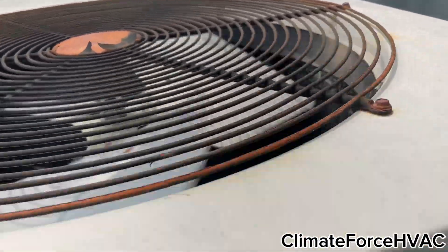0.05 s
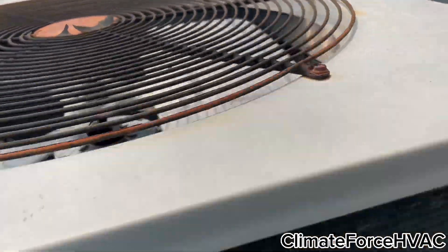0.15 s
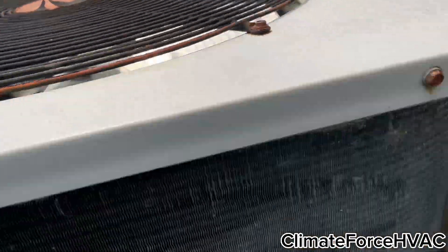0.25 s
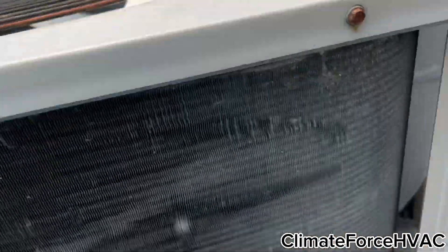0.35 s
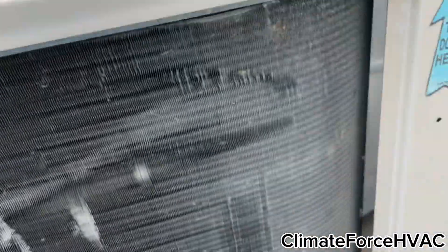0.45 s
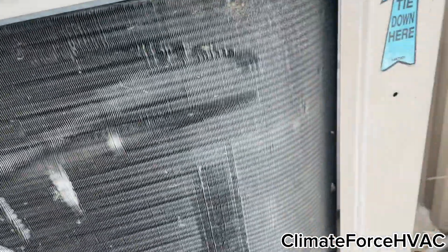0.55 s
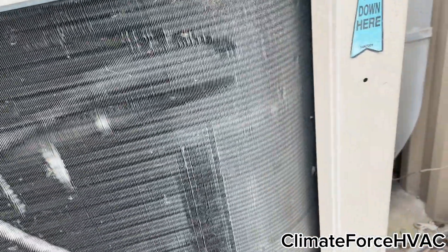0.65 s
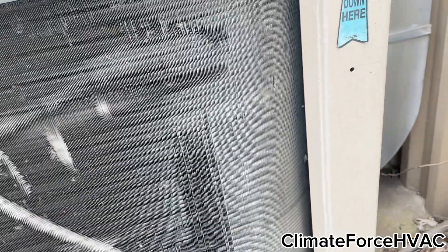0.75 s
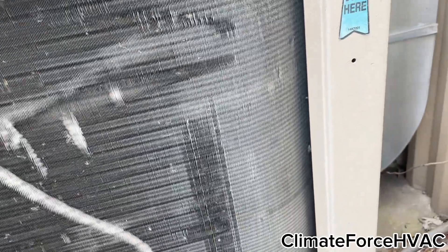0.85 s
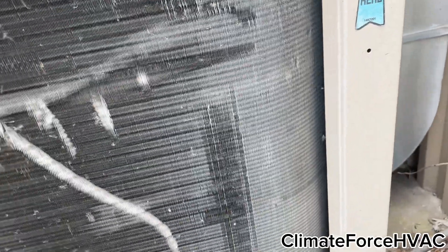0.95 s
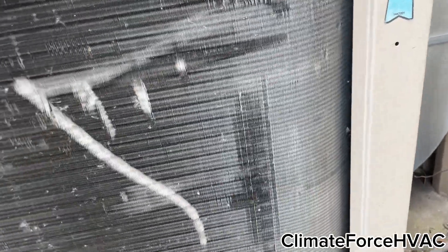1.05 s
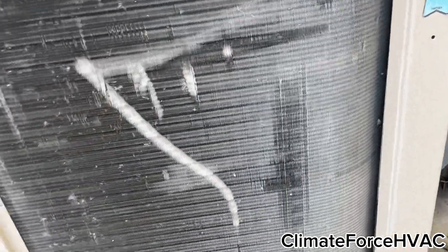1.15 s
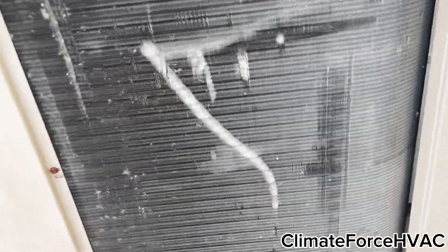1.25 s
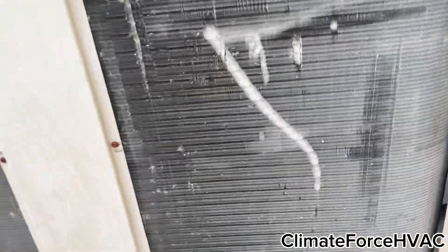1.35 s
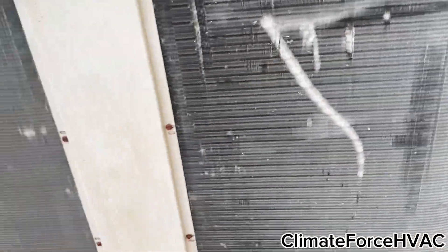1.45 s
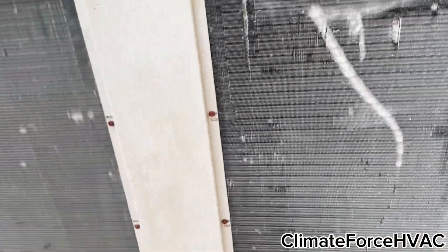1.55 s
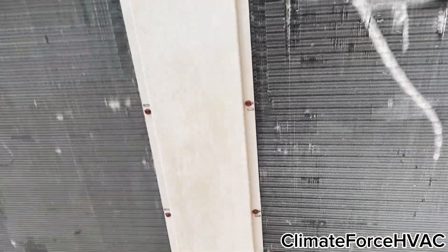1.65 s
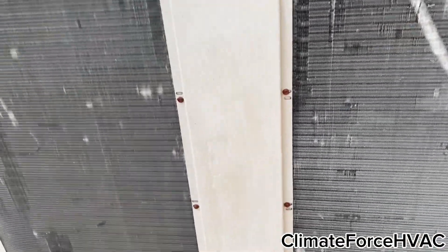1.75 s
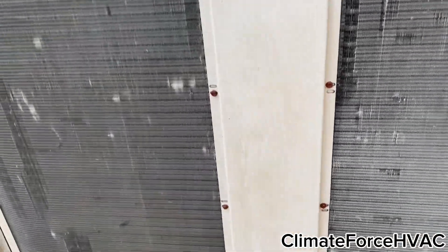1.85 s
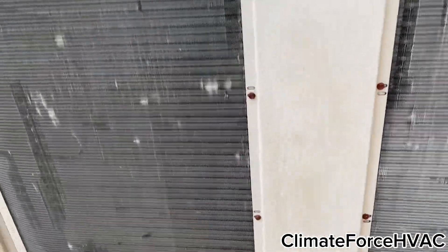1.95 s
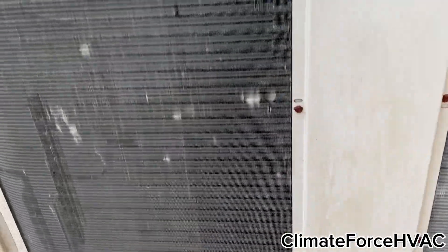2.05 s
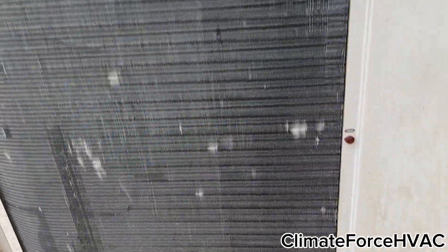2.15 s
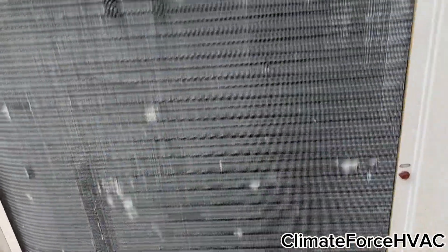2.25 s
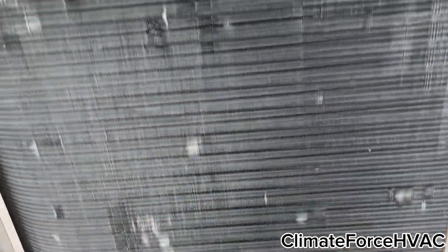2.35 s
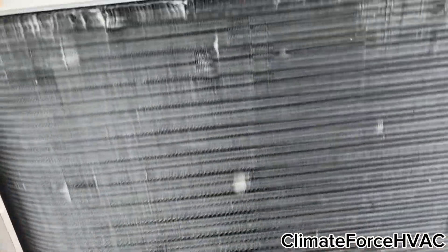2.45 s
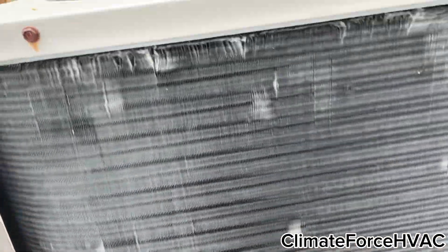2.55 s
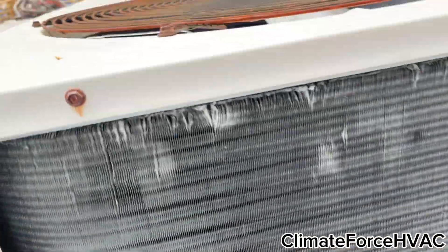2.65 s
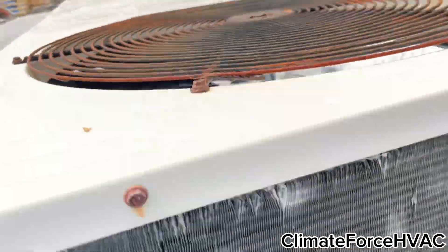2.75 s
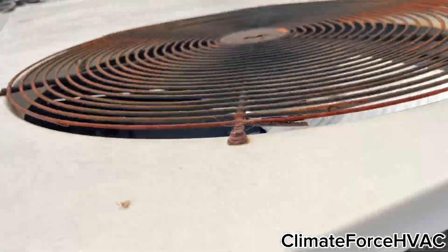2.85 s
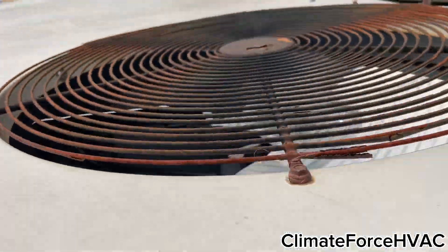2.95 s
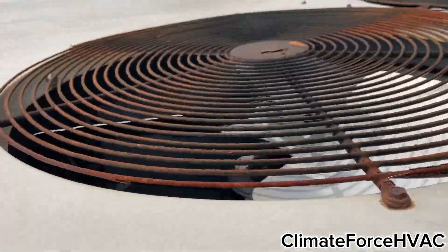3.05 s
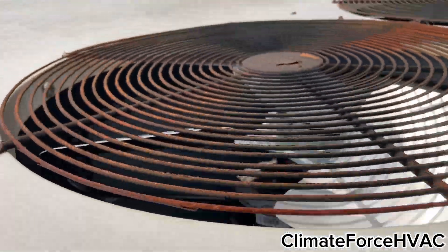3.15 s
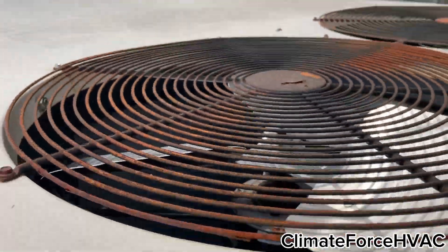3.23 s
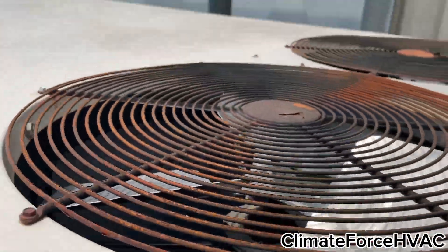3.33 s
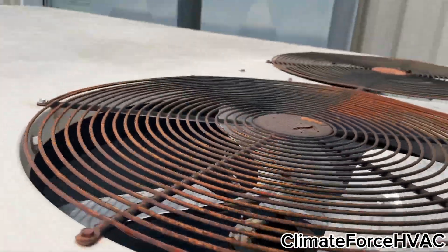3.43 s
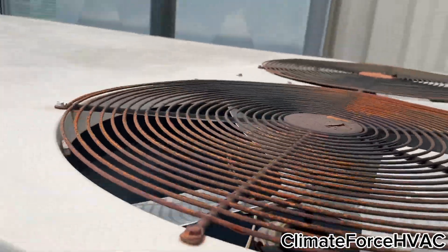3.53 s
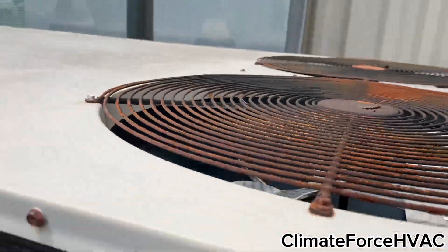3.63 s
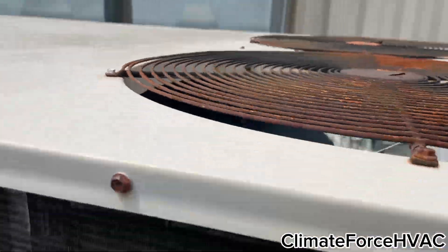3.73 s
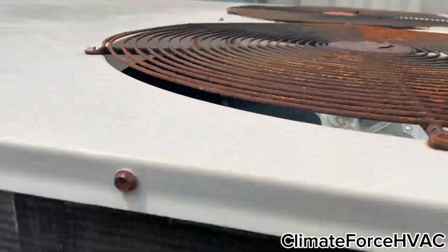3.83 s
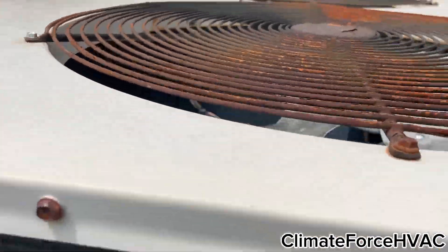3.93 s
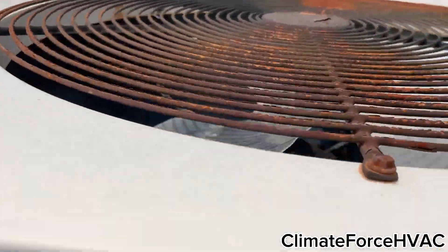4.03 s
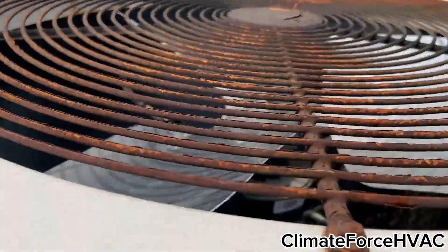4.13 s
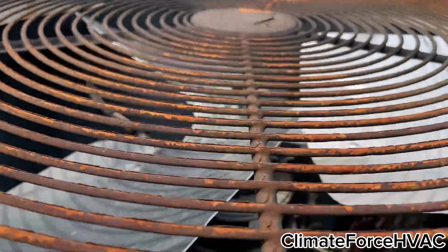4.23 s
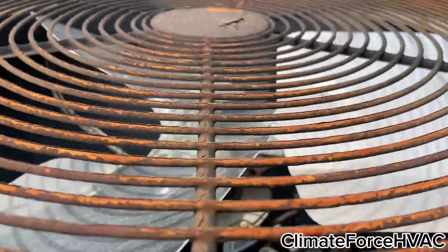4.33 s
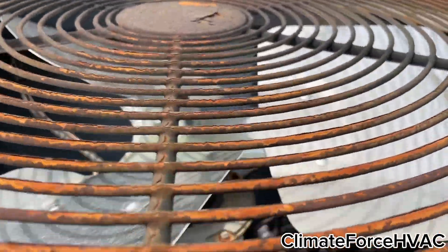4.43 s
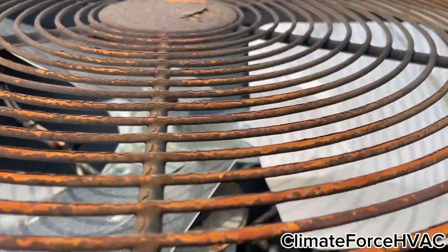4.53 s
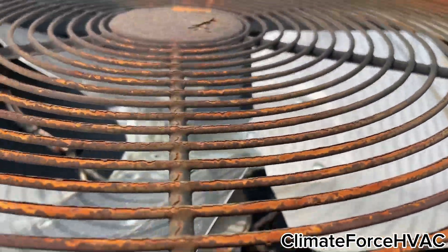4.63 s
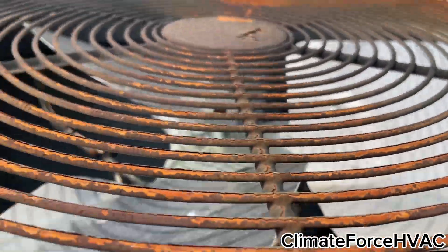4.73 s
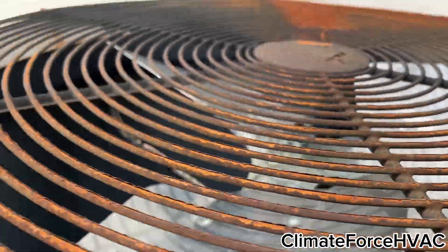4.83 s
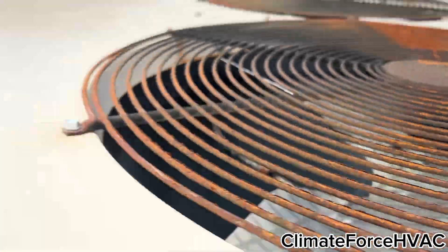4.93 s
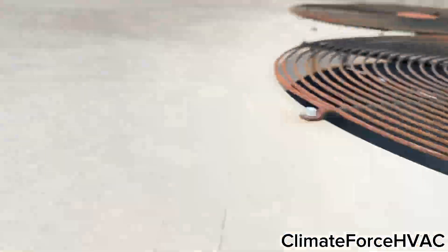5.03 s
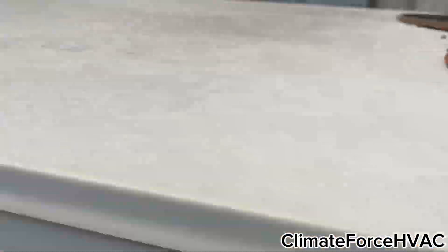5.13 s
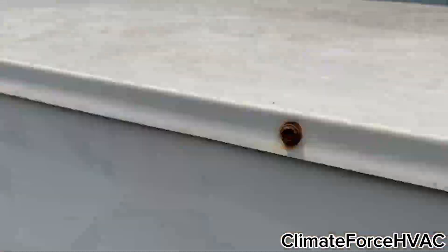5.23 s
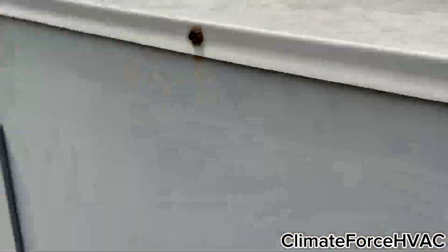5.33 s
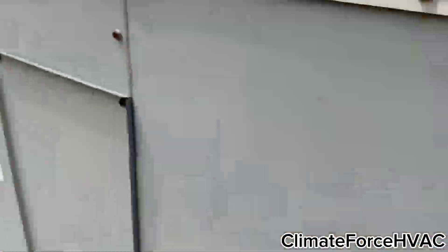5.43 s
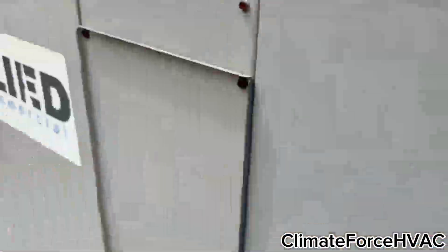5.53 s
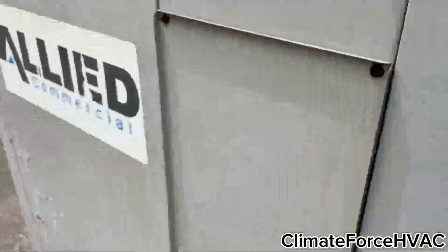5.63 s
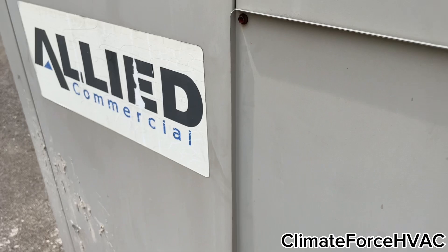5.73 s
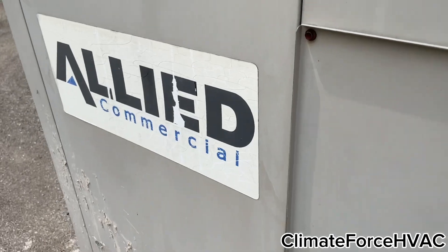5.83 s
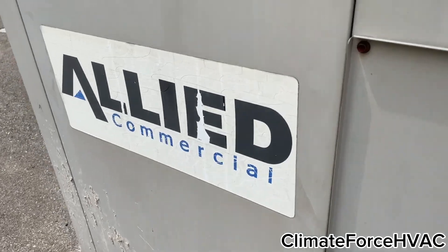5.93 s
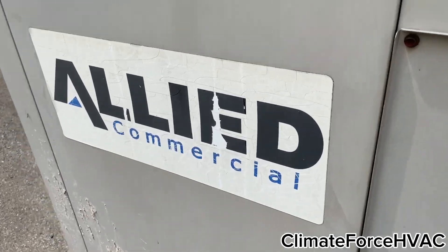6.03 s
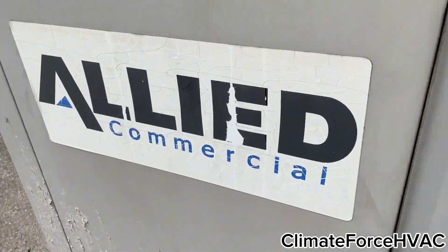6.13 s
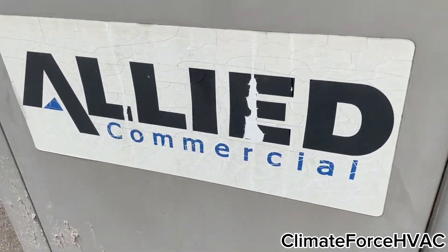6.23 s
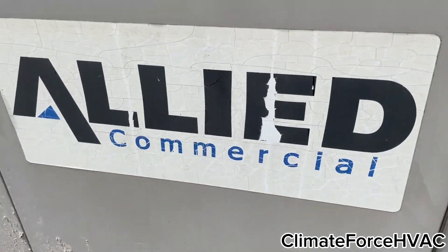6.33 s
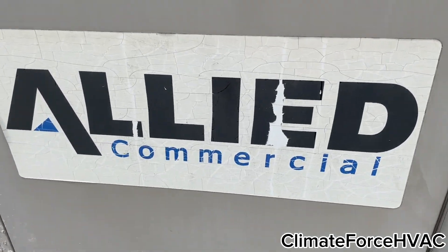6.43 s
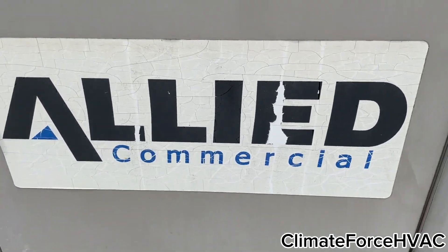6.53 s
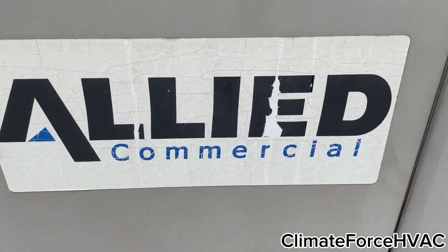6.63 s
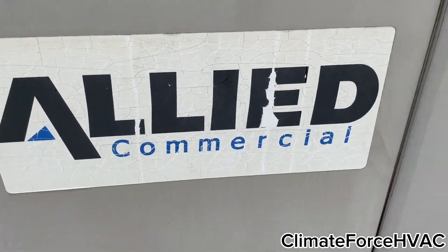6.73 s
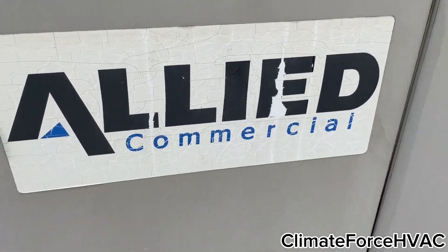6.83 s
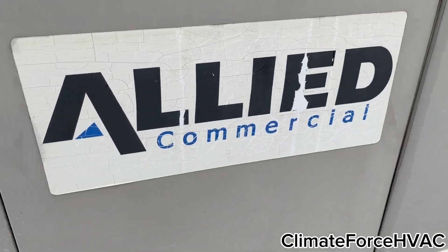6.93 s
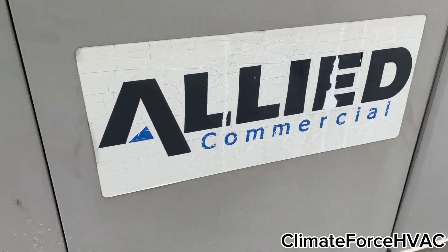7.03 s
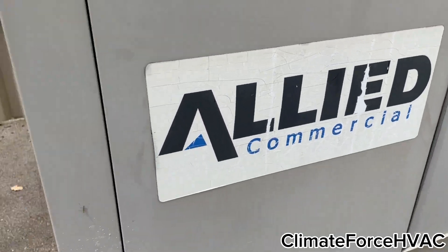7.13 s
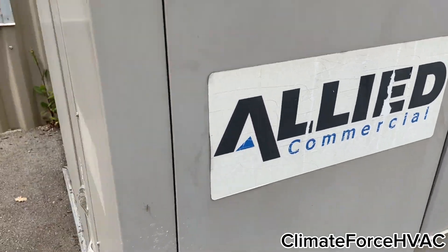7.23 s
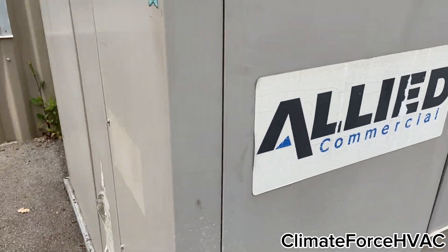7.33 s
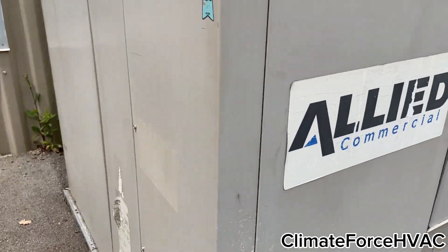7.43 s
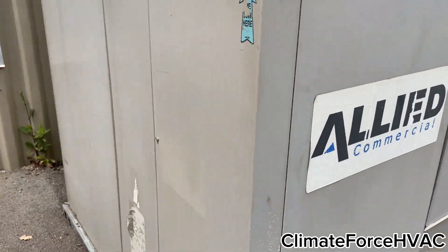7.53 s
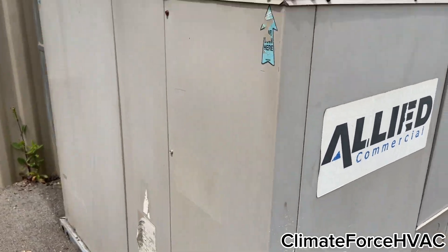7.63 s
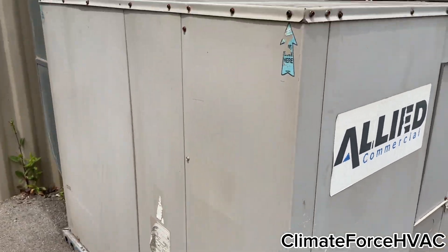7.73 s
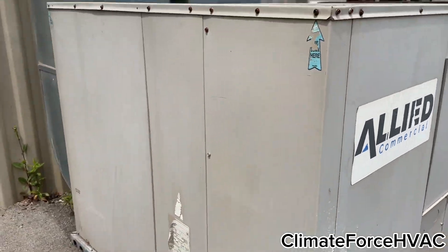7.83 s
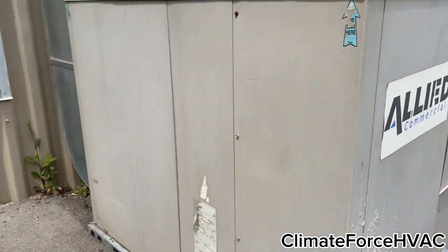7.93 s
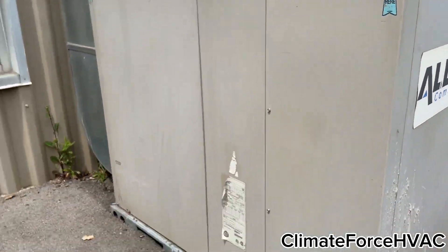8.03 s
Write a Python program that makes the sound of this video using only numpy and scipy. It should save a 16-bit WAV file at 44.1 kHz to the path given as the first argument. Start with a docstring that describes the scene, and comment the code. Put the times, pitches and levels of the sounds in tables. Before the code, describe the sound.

Close, gusty fan noise from an outdoor air conditioner mixes with a steady low hum and a finely pulsing hiss, shifting in tone as the phone is carried past. Wind slaps the microphone with soft bass thuds while a motor whine grows. Past halfway the rush and whine fall away behind the cabinet, and the hum continues with a faint metal buzz, small ticks of grit and a couple of very faint bird chirps.

```python
"""Walking round an outdoor condenser

A hand-held phone passes the coil, goes over the fan grille, then behind the cabinet. Fan air rumbles,
rushes, hisses and slaps the microphone. The compressor hums and puffs gas on every turn, while a second
motor whines and makes the cabinet buzz. Grit ticks underfoot and a bird chirps far off.
The treble reaches the phone's two microphone openings (ports) slightly out of step."""
import sys
import numpy as np
from scipy import signal
from scipy.fft import rfft, irfft, next_fast_len
from scipy.io import wavfile
from scipy.ndimage import uniform_filter1d

SR = 44100
rng = np.random.default_rng(int(sys.argv[2]) if len(sys.argv) > 2 else 0)


def put_to_file(sound):
    """Save the sound as 16-bit audio at rate SR, in the file named by the first command-line argument."""
    columns = np.atleast_2d(sound).T  # one column per channel
    safe = np.clip(columns, -1, 1)
    whole_steps = np.round(safe * 32767)
    wavfile.write(sys.argv[1], SR, whole_steps.astype(np.int16))


N = 356283
TIME = np.arange(N) / SR
SIZE = next_fast_len(N)
FREQ = np.arange(SIZE // 2 + 1) * SR / SIZE + 1
SIDES = np.array([[1], [-1]])  # plus for left, minus for right
SECOND_MOTOR_HZ = 58.88  # turns per second

# Fan air along the walk: time_s, coil_roar_db, blade_rush_db, grille_hiss_db, left_minus_right_db
FAN_AIR = [(0, -25.5, -28.5, -35, -0.5), (.3, -32, -31, -38, 1), (.6, -28, -32, -41, 0.5),
           (.9, -25.5, -32.5, -41, 0.5), (1.25, -29, -32, -39, -0.5), (1.75, -33.5, -31, -39.5, -1.5),
           (2.2, -36, -34, -42, -1.5), (2.55, -32, -36, -43, -1), (3.45, -32, -34.5, -42.5, -1.5),
           (3.8, -34, -39.5, -43.5, -1), (4.2, -33.5, -36, -43, -0.5), (4.45, -27.5, -38, -40.5, 1),
           (4.7, -30, -40, -40.5, 0), (4.98, -31, -37.5, -44.5, -1), (5.07, -35.5, -38.5, -45, 0),
           (5.15, -35.5, -45, -43.5, -1), (5.32, -39, -48, -50.5, -1.5), (5.6, -43, -49, -50, -3.5),
           (5.9, -42.5, -53, -54.5, -3), (6.4, -44, -54, -52.5, -1), (7.1, -46, -46.5, -55.5, -1.5),
           (7.5, -41.5, -44.5, -52, -1), (8.08, -46, -46.5, -53.5, -1.5)]
# How fast the compressor turns: time_s, rate_hz
COMPRESSOR_RATE = [(0, 51.77), (.6, 51.73), (1.1, 51.7), (1.7, 51.75), (2.3, 51.78), (2.9, 51.78),
                   (3.5, 51.81), (4.1, 51.84), (4.7, 51.8), (5.2, 51.75), (5.7, 51.75), (6.4, 51.74),
                   (7.1, 51.71), (8.08, 51.7)]


def undb(db):
    """Turn decibels into a gain to multiply by."""
    return 10 ** (np.asarray(db) / 20)


def curves(table):
    """Join a table's rows with straight lines in time, giving one curve per value column."""
    times, *columns = np.transpose(table)
    return [np.interp(TIME, times, column) for column in columns]


def shape(points):
    """Gain at each frequency from (pitch_hz, level_db) points, falling 24 dB an octave past the ends."""
    hz, db = np.transpose(points)
    octaves_outside = np.maximum(np.log2(FREQ / hz[-1]), 0) + np.maximum(np.log2(hz[0] / FREQ), 0)
    return undb(np.interp(np.log(FREQ), np.log(hz), db) - 24 * octaves_outside)


def wander(rate_hz):
    """A smooth random wobble, about 1 in size, with rate_hz new values a second."""
    hold = int(SR / rate_hz)
    steps = np.repeat(rng.standard_normal(N // hold + 1), hold)
    return 1.3 * uniform_filter1d(uniform_filter1d(steps, hold), hold)[:N]


def noise(points, spread_db=0):
    """Shaped noise in two rows: a direct part of strength 1 and a scattered part that adds width."""
    # Scattered sound compared with direct sound: pitch_hz, level_db
    scattered = [(20, -22), (60, -14), (150, -11), (300, -10.5), (500, -7.5), (800, -6), (1500, -5.5),
                 (3000, -5.5), (5500, -4.5), (7500, -38), (18000, -34)]
    colour = shape(points) * np.array([np.ones(len(FREQ)), shape(scattered) * undb(spread_db)])
    parts = irfft(rfft(rng.standard_normal((2, SIZE))) * colour, SIZE)[:, :N]
    return parts / parts[0].std()


def shade():
    """Going behind the cabinet: how hidden the phone is (0 to 1), seconds walked before, seconds after."""
    start_s, end_s = 5.0, 5.36
    return np.interp(TIME, [start_s, end_s], [0, 1]), np.minimum(TIME, start_s), np.maximum(TIME - end_s, 0)


def fan_rumble():
    """Gusty fan wind buffets the ports with deep bass, under a slightly higher drone."""
    # Tone colours of the buffeting and the drone: pitch_hz, level_db
    buffet_colour = [(25, -15), (40, -11), (55, -2), (75, -4), (100, -6.5), (140, -26.5)]
    drone_colour = [(80, -21), (120, 1), (170, 2), (250, -1), (330, -3), (450, -15.5)]
    # Gusts of fan wind: centre_s, rise_db, half_length_s
    gusts = [(1.098, 0, 0.14), (.05, 4, .1), (2.1, 3.5, 0.1), (2.3, -2, .04), (2.44, 3.5, 0.1),
             (2.56, -1, 0.045), (2.85, 3, 0.2), (3.25, 4, 0.1), (4.2, 0.5, .2), (4.942, 4, 0.13),
             (5.552, 1, 0.15), (6.1, 3.5, 0.1), (6.7, 3.5, 0.18), (7.149, 2, .1)]
    hidden, before_s, after_s = shade()
    gust_db = sum(db * np.exp(-((TIME - s) / length) ** 2) for s, db, length in gusts)
    retreat_db = -2.5 * after_s  # stepping back
    buffet_db = -29.5 - hidden + retreat_db + gust_db
    late_shade_db = np.interp(TIME, [5.14, 6], [0, -7])  # the drone bends round the cabinet, so sinks later
    grille_db = 15 * np.exp(-(TIME / 0.095) ** 2)  # loud at first, as the phone leaves the grille
    approach_db = 1.0 * before_s  # rising on the way to the cabinet top
    drone_db = -34 + approach_db + late_shade_db + retreat_db + 0.24 * gust_db + grille_db
    buffet = noise(buffet_colour) * undb(buffet_db + 1.7 * wander(7) + 2.0 * wander(19))
    return buffet + noise(drone_colour) * undb(drone_db + 1.2 * wander(9.2))


def fan_air():
    """Swirling air roars in the coil, rushes at the blades and their housing, and hisses at the grille."""
    # Tone colours of those sounds, and of the hiss from behind the cabinet: pitch_hz, level_db
    roar_colour = [(250, -12), (350, -1.5), (480, 0.5), (640, -2.5), (850, -9), (1200, -26.5)]
    rush_colour = [(400, 0.5), (750, 3), (1050, 1), (1350, -3), (1750, -8), (2600, -14)]
    housing_colour = [(850, -10.5), (1000, 2), (1300, -3.5), (1500, -12.5)]
    hiss_colour = [(1100, -6), (1800, -8), (2500, -4), (3200, -4.5), (4200, -4.5), (5500, -8.5),
                   (8000, -8.5), (15000, -10.5)]
    hidden_hiss_colour = [(1100, -10), (1700, -6.5), (2000, -4.5), (2600, -7.5), (3700, -5.5), (4230, -7),
                          (5000, -8), (5900, -7), (8000, -13), (15000, -12)]
    # A hollow ring, and the rush at the fan housing: time_s, pitch_hz, hollow_db, housing_db
    hollow_and_housing = [(0, 3420, -44, -53), (.3, 2805, -49, -45), (.6, 2600, -47.5, -38.5),
                          (.9, 2660, -49, -44), (1.15, 2440, -43.5, -49), (1.4, 2144, -44.5, -43),
                          (1.7, 2050, -52, -51), (1.9, 2150, -64, -51), (2.3, 2245, -58, -51),
                          (2.7, 2460, -55, -49), (3.1, 2354, -53, -47), (3.45, 2297, -62, -40.5),
                          (3.9, 2500, -64, -45), (4.3, 2520, -51.5, -39), (4.75, 2510, -51, -38.5),
                          (4.92, 2050, -57, -38), (5.08, 1986, -48, -42), (5.25, 2286, -58, -46.5),
                          (5.6, 2600, -64, -55), (5.95, 2660, -60, -61), (6.3, 2600, -68, -58),
                          (8.08, 2500, -68, -68)]
    # A second, higher hollow ring: time_s, pitch_hz, level_db
    upper_hollow = [(0, 3690, -56), (1, 3690, -60), (1.5, 4400, -58), (2, 3810, -50), (2.5, 4080, -58),
                    (2.9, 3750, -54), (3.3, 4404, -54), (3.6, 4645, -50), (3.9, 4100, -60),
                    (4.15, 3890, -51), (4.35, 4295, -55), (4.6, 3970, -52), (4.85, 4300, -55),
                    (5.2, 4500, -64), (5.45, 4540, -61), (5.7, 4600, -70), (8.08, 4620, -73)]
    roar_db, rush_db, hiss_db, _ = curves(FAN_AIR)
    hollow_hz, hollow_db, housing_db = curves(hollow_and_housing)
    hidden = shade()[0]
    air = noise(roar_colour) * undb(roar_db + 0.58 * wander(14))
    air += noise(rush_colour) * undb(rush_db + wander(13))
    air += hollow_ring(hollow_hz, hollow_db, width_hz=210)
    air += hollow_ring(*curves(upper_hollow), width_hz=330)
    air += noise(housing_colour) * undb(housing_db + 0.61 * wander(10))
    hiss = np.sqrt(1 - hidden) * noise(hiss_colour) + np.sqrt(hidden) * noise(hidden_hiss_colour)
    return air + hiss * undb(hiss_db + 1.1 * wander(25))


def hollow_ring(hz, db, width_hz):
    """Air rings in the gap between cabinet and phone; the pitch shifts with the gap."""
    slow = [noise([(20, 0), (width_hz, -3)], spread_db=3.0) for _ in range(2)]
    phase = 2 * np.pi * np.cumsum(hz) / SR
    return (slow[0] * np.cos(phase) + slow[1] * np.sin(phase)) * undb(db + wander(5))


def wind_slaps():
    """Fan wind slaps the ports: a few steep waves of bass that swell, hold and fade."""
    # Single slaps: centre_s, level_db, half_length_s, pitch_hz, left_minus_right_db
    slaps = [(1.11, -17, .014, 72, 2), (1.308, -20, .016, 77.6, 1), (1.511, -23, .016, 76, 1),
             (2.093, -19, .015, 78, 0), (2.129, -18, 0.013, 82, 2), (2.361, -18, 0.019, 84, 1),
             (2.402, -19, 0.014, 75, 0), (2.484, -15.5, 0.016, 78, 3), (2.659, -21, .012, 77, 1),
             (2.717, -15, .015, 68.4, 1), (2.789, -19, 0.012, 78, 0), (2.838, -15, .016, 75, 2),
             (2.922, -20, .015, 74, -1), (3.018, -19, .014, 66, 2), (3.056, -16.5, .015, 78, 2),
             (3.126, -20, .013, 74.6, 7), (4.448, -20, .022, 72, 2), (4.797, -20, .013, 74, 2),
             (4.926, -20, .012, 71, 2), (4.995, -18.5, .02, 73, 1), (5.197, -11, .022, 62, 2),
             (5.241, -16, 0.0099, 90, 2), (5.713, -24, .025, 74, 0)]
    out = 0
    for s, db, length, hz, pan_db in slaps:
        swell = np.exp(-abs((TIME - s) / length) ** 3)
        phase = 2 * np.pi * hz * (TIME - s)
        wave = np.sin(phase) - 0.3 * np.sin(2 * phase)  # the octave makes it steeper
        out += undb(db + SIDES * pan_db / 2) * swell * wave
    return out


def compressor_hum():
    """Tones at multiples of the turn rate arrive straight and off a far panel, adding or cancelling."""
    # The hum's two paths: time_s, level_change_db, extra_path_m
    paths = [(0, -5, 0.71), (.6, -1, 0.69), (.85, 3, 0.73), (1.1, 7, 0.82), (1.4, 4, 0.75),
             (1.7, 0.5, 0.67), (2.0, -4.5, 0.44), (2.3, -7.5, .34), (2.6, -8, .33), (2.9, -4.5, 0.35),
             (3.5, -1, 0.46), (3.8, -1, 0.7), (4.1, 1, 1.136), (4.7, 2.5, 1.14), (5.2, 1, 1.08),
             (5.7, 2.5, 0.95), (6.4, 2.5, 1.027), (7.1, 3, 1.1), (8.08, -1.5, 1.02)]
    # Multiples 1 to 8: level_db, change_behind_cabinet_db, panel_phase_rad
    strong_tones = [(-34.5, -4.5, -0.85), (-34.5, -8.5, -.51), (-32.5, -11.5, 0.91), (-34.5, -12.5, 0.14),
                    (-41.5, -1.5, -1.53), (-38.5, -9.5, -1.46), (-36.3, -17, -2.5), (-39.5, -7.5, 2.5)]
    # Higher tones, compared with the average of tones 7 and 8: multiple, level_db
    weak_tones = [(9, -10), (10, -5.5), (11, -8), (13, -13), (15, -18)]
    hz = curves(COMPRESSOR_RATE)[0]
    change_db, extra_m = curves(paths)
    hidden = shade()[0]
    phase = 2 * np.pi * np.cumsum(hz) / SR
    start = 2 * np.pi * rng.random(16)
    hum, gains = 0, []
    for k, (db, shade_db, panel_phase) in enumerate(strong_tones, start=1):
        echo = 0.75 * np.exp(1j * (2 * np.pi * k * hz * extra_m / 343 + panel_phase))  # sound: 343 m/s
        gain = undb(db + change_db + shade_db * hidden) * abs(1 + echo)
        flicker_db = 1.64 * wander(4.075) * (k > 2)
        hum += gain * undb(flicker_db) * np.sin(k * phase + start[k - 1])
        gains.append(gain)
    upper_gain = np.sqrt(gains[-1] * gains[-2])
    for k, db in weak_tones:
        hum += upper_gain * undb(db + 2.1 * wander(2.63)) * np.sin(k * phase + start[int(k)])
    return hum


def compressor_gas():
    """Gas hisses as the valves open on each turn: a main puff, with a softer side puff before and after."""
    # Gas hiss along the walk: time_s, level_db, puff_depth (0 to 1), side_puffs_db
    gas_levels = [(0, -41, 0.46, -3), (.36, -35, 0.33, -2), (.8, -40, 0.32, -2), (1.25, -41, 0.4, -4),
                  (1.5, -43.5, 0.57, -3), (2.4, -44, 0.35, 1), (2.86, -38, 0.36, 1.5),
                  (3.02, -44, 0.45, -1), (3.6, -43.5, 0.43, 0), (4.3, -44.5, 0.5, 2), (4.75, -42, 0.3, -7),
                  (5.1, -45.5, 0.56, -9), (5.25, -46.5, 0.7, -7), (5.4, -53, 0.75, -7), (5.5, -58, 0.4, -2),
                  (5.8, -59, .4, 0), (6.4, -64, .7, 0), (7.2, -59, 0.55, 3), (8.08, -60, .7, -2)]
    # Its lower part, strong by the coil and the cabinet edge: time_s, level_db
    low_levels = [(0, -45), (.4, -52), (1.4, -55), (1.7, -66), (3.2, -68), (4.3, -53), (5.0, -65),
                  (5.25, -54), (5.45, -61), (5.8, -65), (8.08, -69)]
    # Tone colours of the hiss and its lower part: pitch_hz, level_db
    gas_colour = [(2500, -3.5), (5000, -4), (7000, -2.5), (9000, 5.5), (11000, 2.5), (13000, -2),
                  (15500, -11)]
    low_colour = [(5300, -19), (5900, -1), (6500, 5), (7200, 6), (7700, -20)]
    # Puffs within one turn, the main one in the first row: centre_turns, half_length_turns, level_db
    valve_puffs = [(0.362, 0.052, 1.5), (0.5, 0.18, -5.5), (0.11, 0.1, -4.5)]
    turns = np.cumsum(curves(COMPRESSOR_RATE)[0]) / SR
    gas_db, depth, side_db = curves(gas_levels)
    scatter_db = 3.5 * rng.standard_normal((N // 800, len(valve_puffs)))  # each puff has its own strength
    puffs = 0
    for k, (centre, length, db) in enumerate(valve_puffs):
        turn, place = np.divmod(turns + 1.5 - centre, 1)
        strength = undb(db + side_db * (k > 0) + scatter_db[turn.astype(int), k])
        puffs += strength * np.exp(-((place - .5) / length) ** 2)
    pulsing = 1 - depth + depth * puffs / uniform_filter1d(puffs, size=8192)
    pulsing /= np.sqrt(uniform_filter1d(pulsing ** 2, size=8192))  # keeps the average power
    gas = noise(gas_colour) * undb(gas_db) + noise(low_colour) * undb(curves(low_levels)[0])
    return gas * pulsing


def motor_whine():
    """The second motor sings at ten times its turn rate; higher tones ring out behind the cabinet."""
    # Loudness of the whine and of the higher tones: time_s, level_db
    whine_levels = [(0, -63), (1.05, -52), (1.5, -61), (1.9, -52), (2.2, -40.5), (2.8, -40), (3.45, -39.5),
                    (3.9, -35.5), (4.6, -37.5), (5.15, -43.5), (5.3, -51), (5.9, -56), (8.08, -51.5)]
    high_levels = [(0, -80), (5.2, -76), (5.55, -67), (5.9, -65), (6.3, -67), (6.7, -72), (7.2, -71),
                   (8.08, -73)]
    # The higher tones: multiple, level_db
    high_tones = [(43, -3), (45, 0), (46, -3), (97, -4), (98, -7)]
    phase = 2 * np.pi * SECOND_MOTOR_HZ * TIME
    whine = undb(curves(whine_levels)[0] + 3.1 * wander(5)) * np.sin(10 * phase)
    for k, db in high_tones:
        whine += undb(curves(high_levels)[0] + db + 2.5 * wander(4)) * np.sin(k * phase)
    return whine


def cabinet_buzz():
    """The panels buzz alike on each turn of the second motor, changing slowly as the phone moves."""
    # Tone colour of the panels: pitch_hz, level_db
    panel_colour = [(640, 2), (940, 7), (1350, 1), (1700, 2), (2000, -9), (2400, -4), (2530, 2), (2590, -4),
                    (2650, 6), (2710, 3), (2770, 1), (2830, -6), (2950, -5), (3300, -10), (4300, -16),
                    (4500, -5), (4600, -8), (5200, -8), (5500, -9), (5750, -2), (5950, -7), (6200, -6),
                    (7000, -12)]
    # Loudness of the buzz at the phone: time_s, level_db
    buzz_levels = [(0, -57), (1.5, -54), (3, -52), (4.5, -57), (5.2, -58), (5.6, -51.5), (6.1, -52.5),
                   (6.6, -53.5), (6.9, -56.5), (7.4, -58), (8.08, -60)]
    steps = 4096  # points in one turn
    place = TIME * SECOND_MOTOR_HZ % 1 * steps
    tone_hz = np.arange(steps // 2 + 1) * SECOND_MOTOR_HZ
    gain = undb(np.interp(tone_hz, *np.transpose(panel_colour), left=-90, right=-90))
    buzz = 0
    for _ in range(3):  # three buzz patterns swell and sink separately
        level_scatter, phase_scatter = rng.standard_normal((2, 2, len(gain)))
        one_turn = irfft(gain * undb(5.5 * level_scatter) * np.exp(9j * phase_scatter))
        one_turn = one_turn / one_turn.std() * undb([[0], [-1.5]])  # direct, scattered
        repeated = np.array([np.interp(place, np.arange(steps), part, period=steps) for part in one_turn])
        buzz += repeated * undb(3 * wander(3))
    return buzz / 2 * undb(curves(buzz_levels)[0])


def thin_whistle():
    """A faint, very high whistle made of a narrow band of noise."""
    # Its loudness: time_s, level_db
    whistle_levels = [(0, -80), (5, -74), (5.4, -69), (6, -75), (7, -71), (7.6, -71), (8.08, -65)]
    return noise([(14000, -30), (14400, 0), (14800, -30)]) * undb(curves(whistle_levels)[0])


def grit_ticks():
    """Grit underfoot gives short bursts of noise."""
    # Single ticks: start_s, level_db, pitch_hz, left_minus_right_db, decay_s
    ticks = [(1.9694, -45, 3710, 2, .008), (3.5903, -27.5, 2120, 1, 0.015), (5.4626, -41, 5970, 2, 0.0018),
             (5.6225, -40.5, 3200, 11, .005), (5.739, -39.5, 3800, 9, 0.0052), (6.179, -39, 2470, 5, .006),
             (6.387, -38.5, 3950, 3.5, 0.003), (6.88, -49, 4500, 3, .005), (6.969, -50, 4770, 3, .005),
             (7.435, -43, 3200, 11, .002), (7.4624, -36, 3200, 5, .003)]
    out, t = np.zeros((2, N)), np.arange(1600) / SR
    for s, db, hz, pan_db, decay in ticks:
        burst = rng.standard_normal((2, len(t))) * np.exp(-t / decay) * np.minimum(3 * t / decay, 1)
        band = signal.butter(2, [.5 * hz, 1.5 * hz], "band", fs=SR, output="sos")
        tick = signal.sosfilt(band, burst[0] + 2.0 * burst)  # the two sides share some noise
        i = int(s * SR)
        out[:, i:i + len(t)] += undb(db + SIDES * pan_db / 2) * tick
    return out


def bird():
    """Brief raspy whistles that glide fast, then settle, smeared by echoes off walls."""
    # Single chirps: start_s, length_s, start_hz, end_hz, level_db
    chirps = [(6.506, .014, 3900, 3780, -54), (6.52, 0.019, 3820, 3800, -47), (6.53, .012, 3550, 3300, -51),
              (6.577, 0.016, 2930, 2850, -49), (6.579, 0.03, 3700, 3170, -50),
              (6.591, 0.028, 2540, 2490, -45), (7.335, .008, 3000, 2800, -52),
              (7.35, 0.0089, 3200, 2900, -53), (7.36, .008, 3400, 3000, -50)]
    song = np.zeros(N)
    for s, length, start_hz, end_hz, db in chirps:
        n, i = int(length * SR), int(s * SR)
        hz = end_hz + (start_hz - end_hz) * np.linspace(1, 0, n) ** 2
        song[i:i + n] += undb(db) * np.sqrt(np.hanning(n)) * np.sin(2 * np.pi * np.cumsum(hz) / SR)
    song *= undb(4.5 * wander(300))  # the rasp
    echo_db, echo_decay_s = -8, .02
    tail = rng.standard_normal((2, 4096)) * np.exp(-np.arange(4096) / SR / echo_decay_s)
    tail *= undb(echo_db) / np.sqrt((tail ** 2).sum(axis=1, keepdims=True))
    return song + signal.fftconvolve(song[None], tail, axes=1)[:, :N]


def yard():
    """A steady, mostly low wash of noise stands for the sound coming back from the walls around."""
    # Its tone colour: pitch_hz, level_db
    yard_colour = [(60, 14.5), (150, -1.5), (400, -11), (900, -18.5), (1600, -20.5), (2100, -35),
                   (3700, -57), (6000, -31), (7500, -36), (15500, -56)]
    return noise(yard_colour, spread_db=7.0) * undb(-36)


def shifting_echoes(sound):
    """Nearby echoes add or cancel as the hand moves: each ninth of an octave swells and sinks at random."""
    spectrum = rfft(sound, SIZE)
    place = 9 * np.log2(np.clip(FREQ, 450, 14000) / 450)
    out = 0
    for k in range(46):
        band = irfft(spectrum * np.clip(1 - abs(place - k), 0, 1), SIZE)[:N]
        out += band * undb(1.2 * (k > 0) * wander(3))  # the lowest band stays steady
    return out


def microphone_ports(direct, scattered):
    """Direct sound reaches the two ports out of step; scattered sound differs between them."""
    # How far the left port is ahead (negative means behind): pitch_hz, phase_rad
    left_lead = [(20, 0), (900, -.1), (1900, -.7), (3500, -.2), (6200, -.4), (7700, -2.7), (8250, -np.pi),
                 (8750, -3.6), (10350, -5.4), (10800, -6.15), (12100, -6.45), (12500, -7.1), (14300, -9.1),
                 (15000, -3 * np.pi), (18000, -9.6)]
    # How much louder the left port is: pitch_hz, left_minus_right_db
    left_boost = [(20, 1), (150, 1), (300, 1.5), (700, 2.5), (2200, 2.5), (4100, 2.5), (6500, .5),
                  (8000, 0)]
    half_lead = np.interp(FREQ, *np.transpose(left_lead)) / 2
    ports = rfft(direct, SIZE) * np.exp(1j * SIDES * half_lead) + SIDES * rfft(scattered, SIZE)
    ports *= undb(SIDES * np.interp(FREQ, *np.transpose(left_boost)) / 2)
    # turning the phone shifts bass and middle from port to port; the treble stays level
    low_share = np.clip(1.7 - FREQ / 4500, 0, 1)
    low = irfft(ports * low_share, SIZE)[:, :N]
    high = irfft(ports * (1 - low_share), SIZE)[:, :N]
    pan_db = curves(FAN_AIR)[-1]
    return low * undb(SIDES * (pan_db - pan_db.mean()) / 2) + high


def scene():
    """The machine and the yard as the two ports hear them, plus grit, bird and wind slaps."""
    direct, scattered = fan_rumble() + fan_air() + compressor_gas() + cabinet_buzz() + thin_whistle()
    wash = yard()
    direct = shifting_echoes(direct)
    tones = np.sqrt(2) * (compressor_hum() + motor_whine())
    tones = tones * np.array([[1], [0.03]])  # a little stronger at the left port
    direct, scattered = np.array([direct, scattered]) + wash + tones
    return microphone_ports(direct, scattered) + grit_ticks() + bird() + wind_slaps()


def record(dry):
    """The phone cuts the deepest bass and the highest treble."""
    bottom_hz, top_hz = 30, 15600
    dry = signal.sosfilt(signal.butter(2, bottom_hz, "high", fs=SR, output="sos"), dry)
    return signal.sosfilt(signal.ellip(12, .2, 80, top_hz, fs=SR, output="sos"), dry)


dry = scene()
out = record(dry)
put_to_file(out)
```